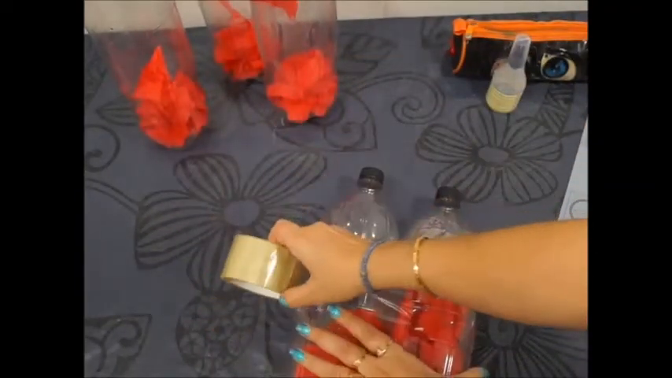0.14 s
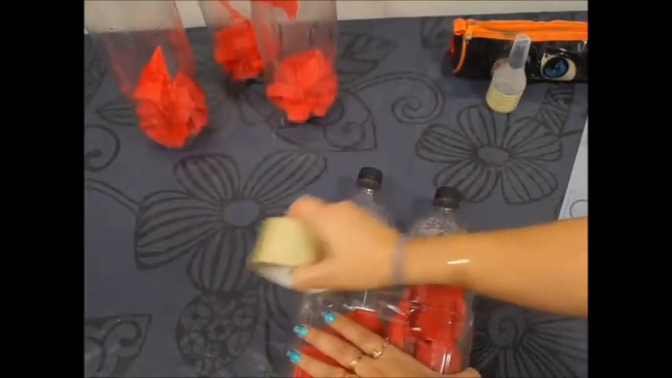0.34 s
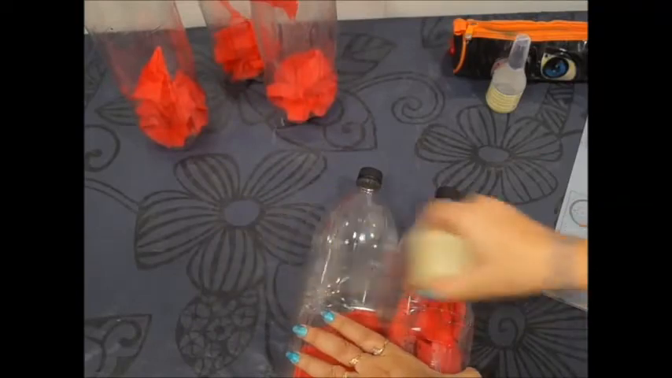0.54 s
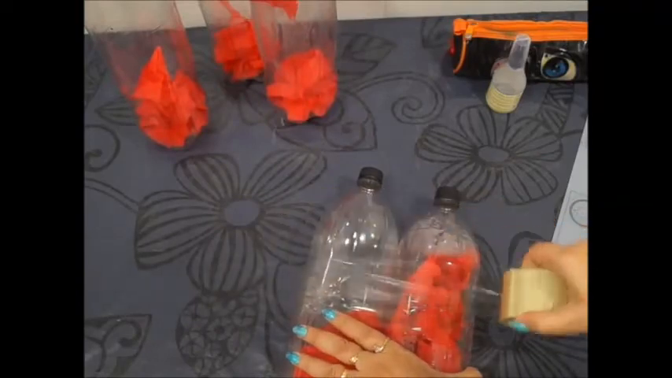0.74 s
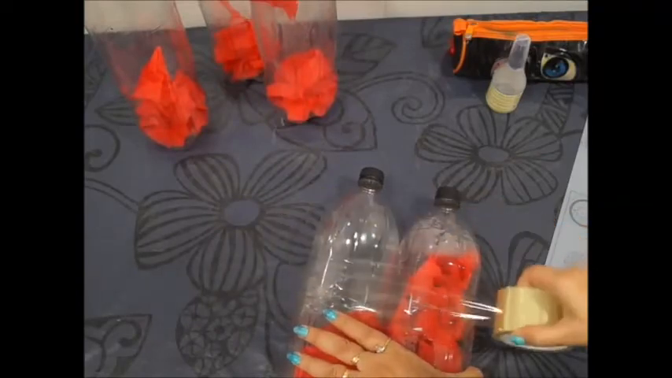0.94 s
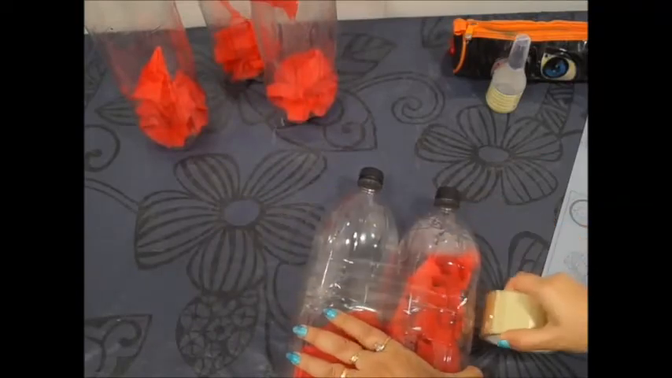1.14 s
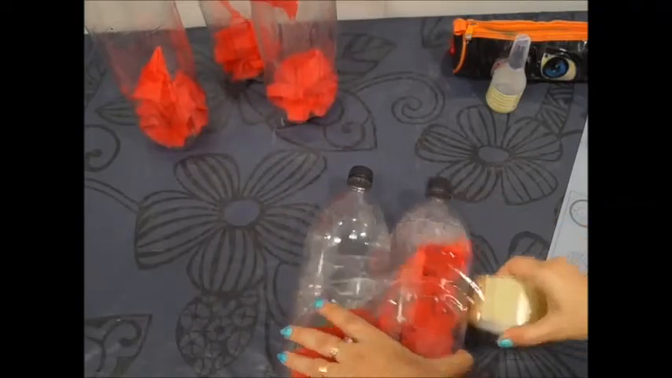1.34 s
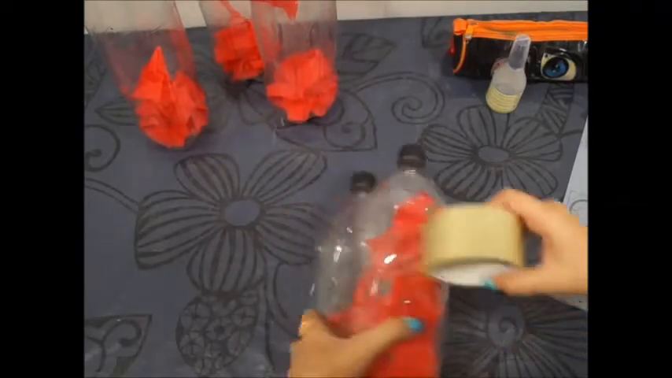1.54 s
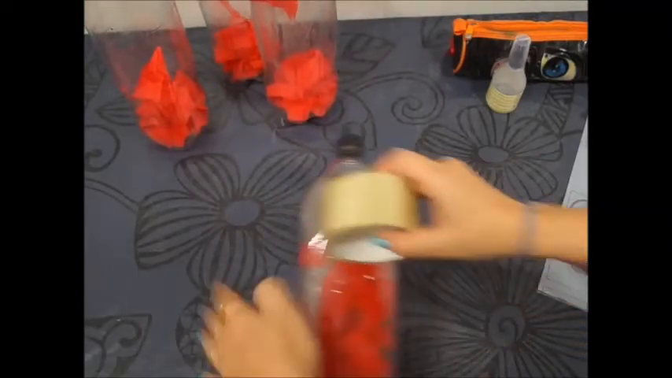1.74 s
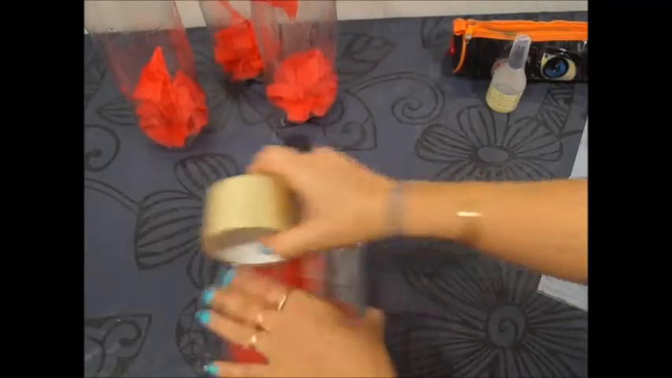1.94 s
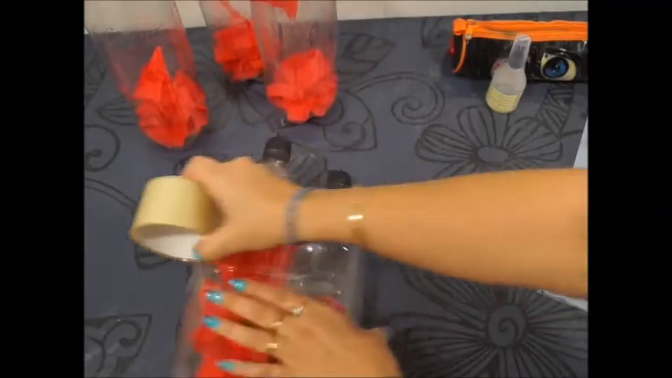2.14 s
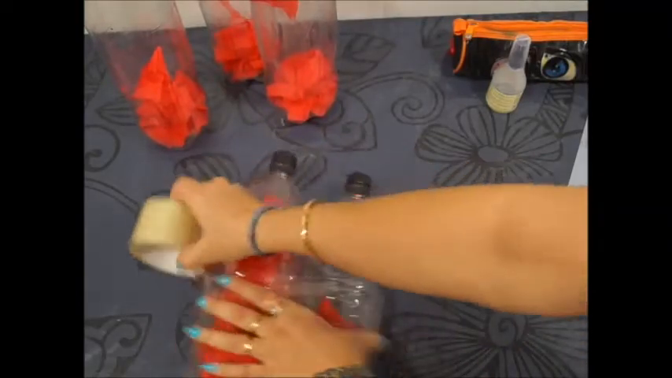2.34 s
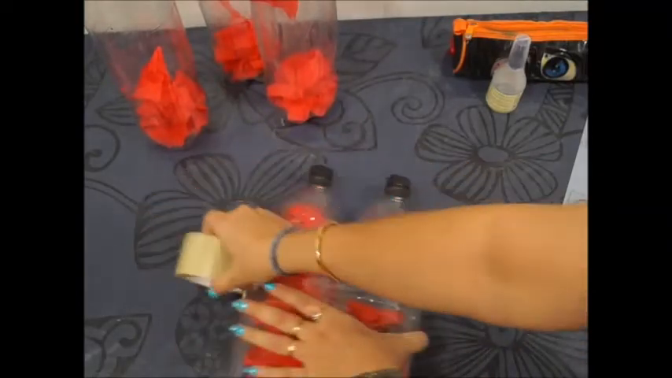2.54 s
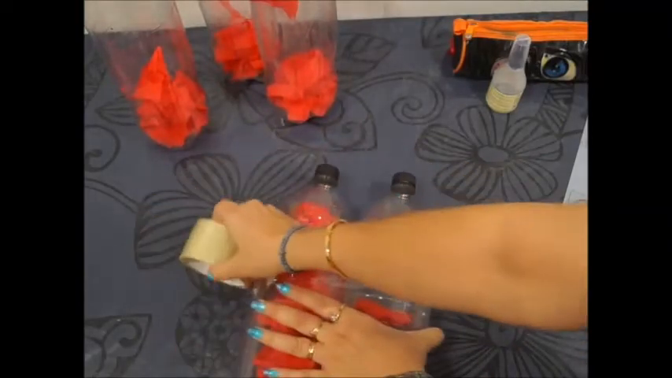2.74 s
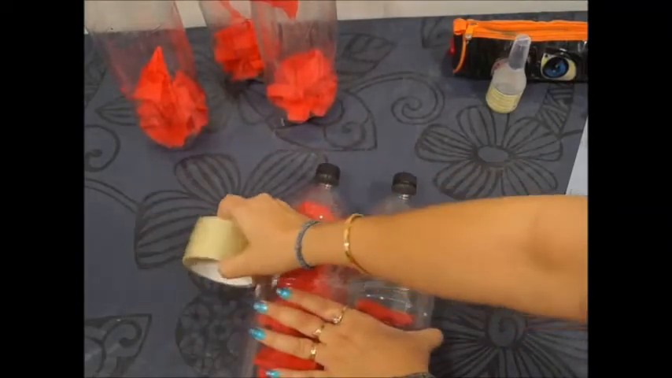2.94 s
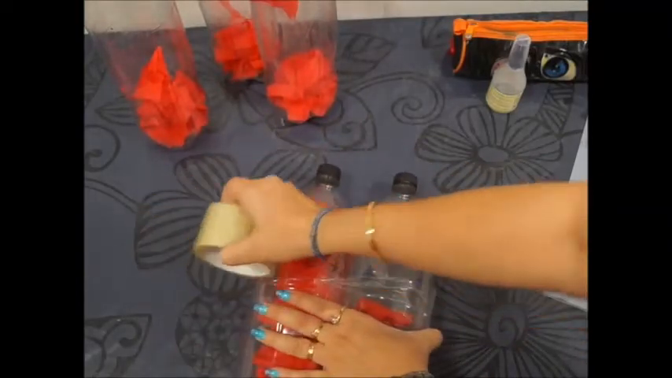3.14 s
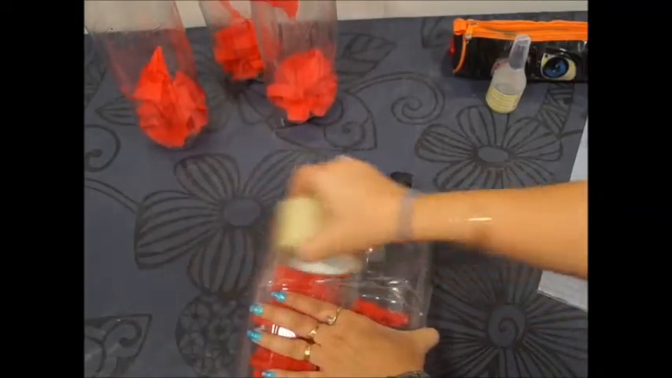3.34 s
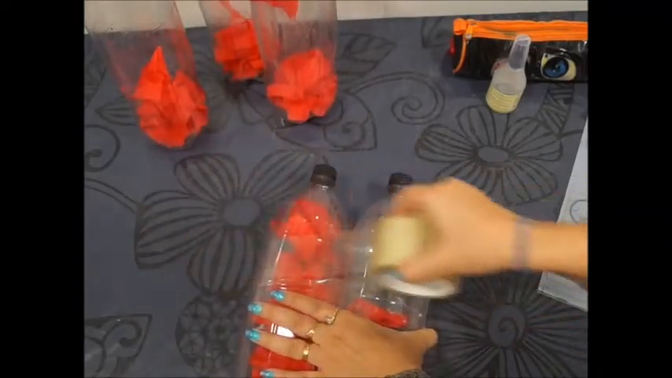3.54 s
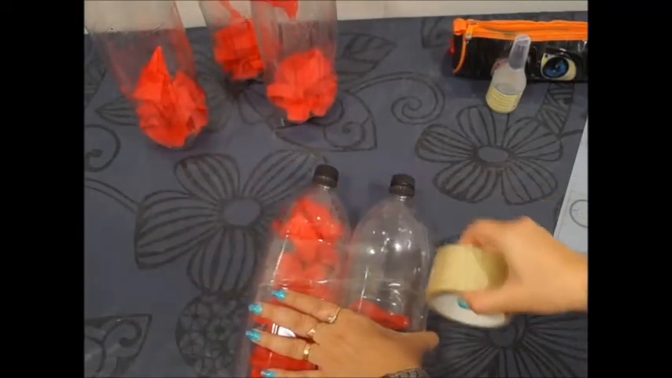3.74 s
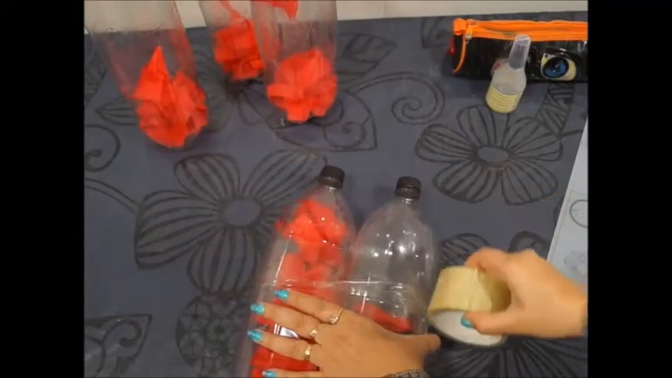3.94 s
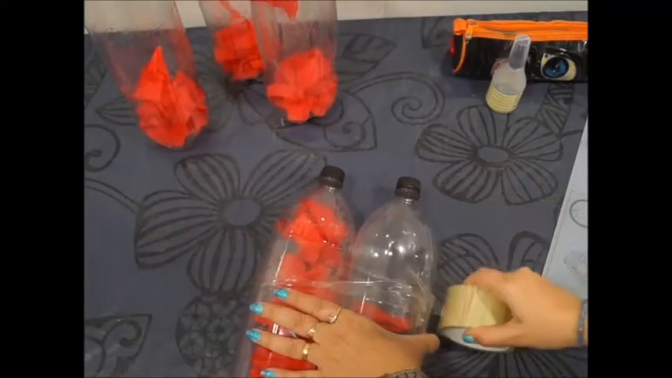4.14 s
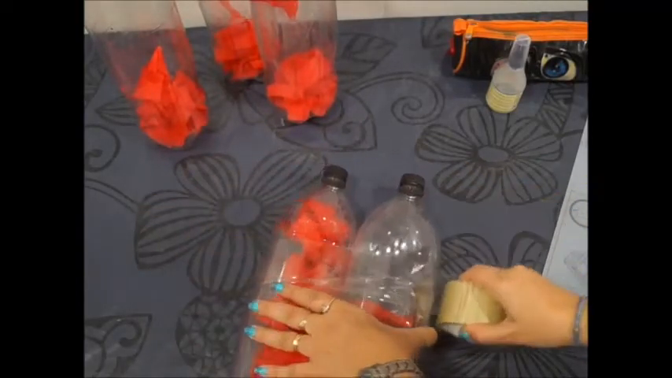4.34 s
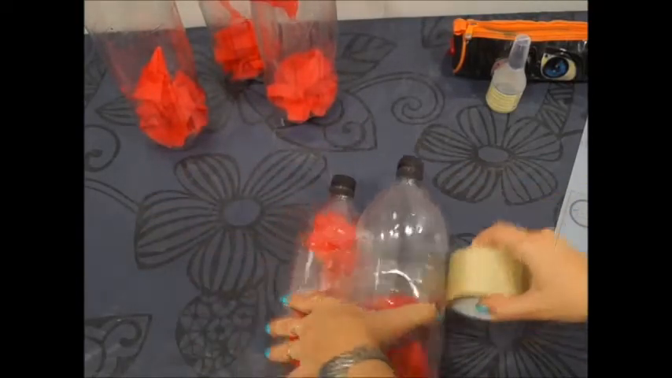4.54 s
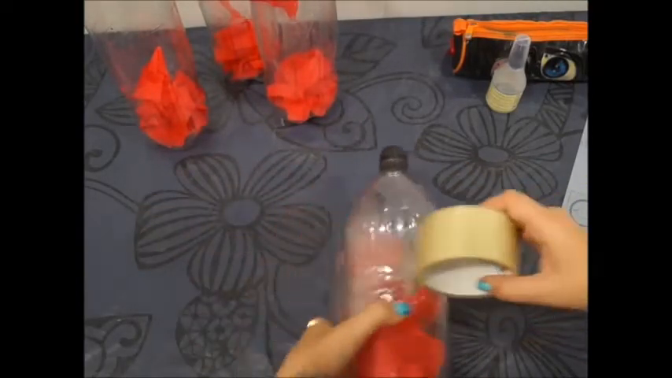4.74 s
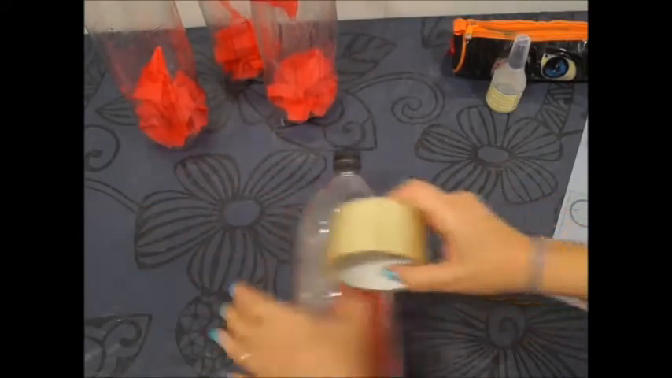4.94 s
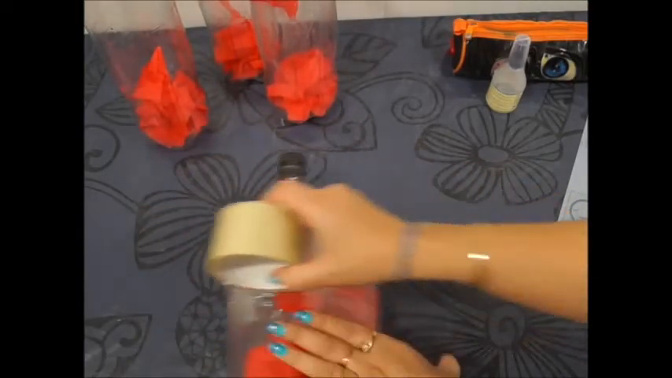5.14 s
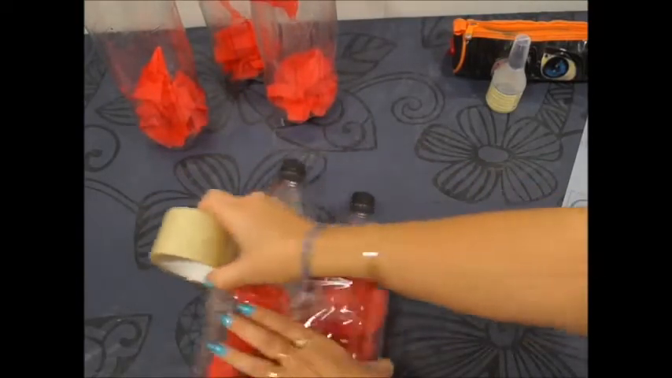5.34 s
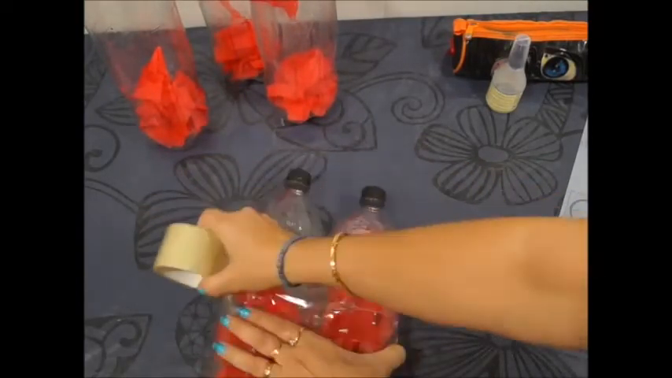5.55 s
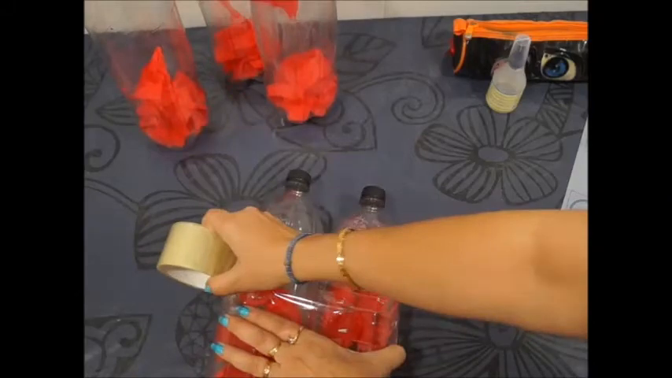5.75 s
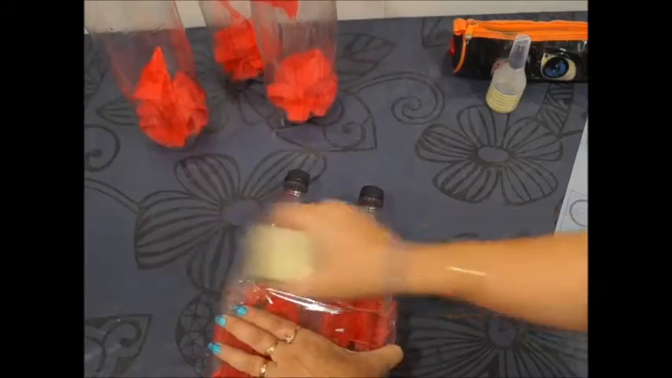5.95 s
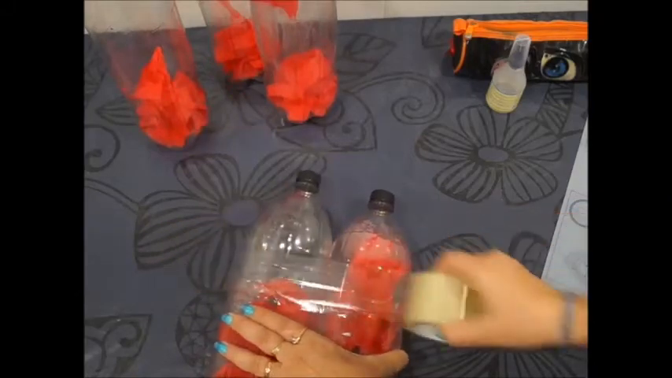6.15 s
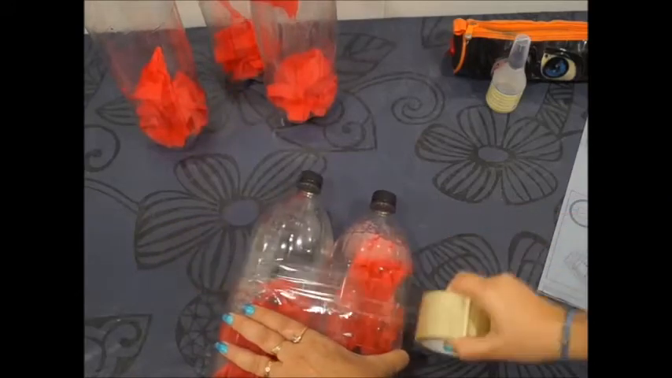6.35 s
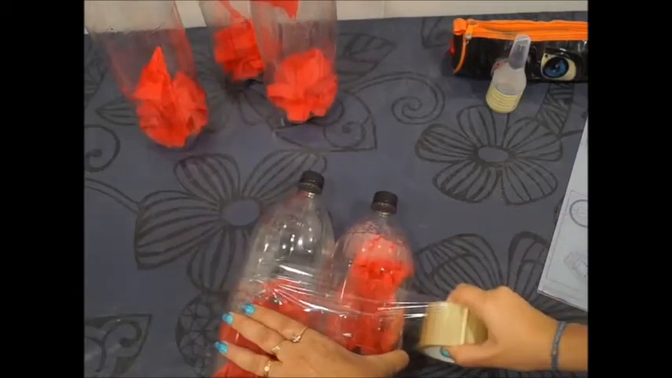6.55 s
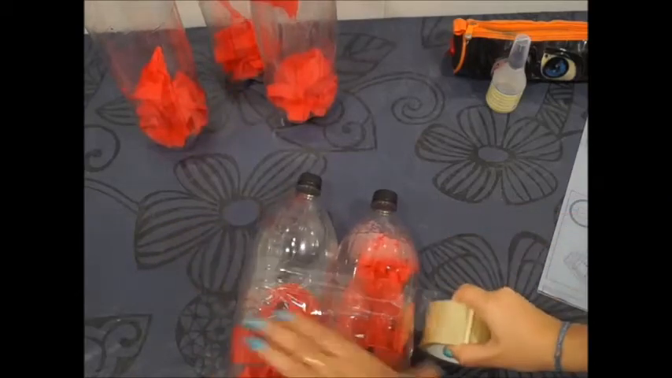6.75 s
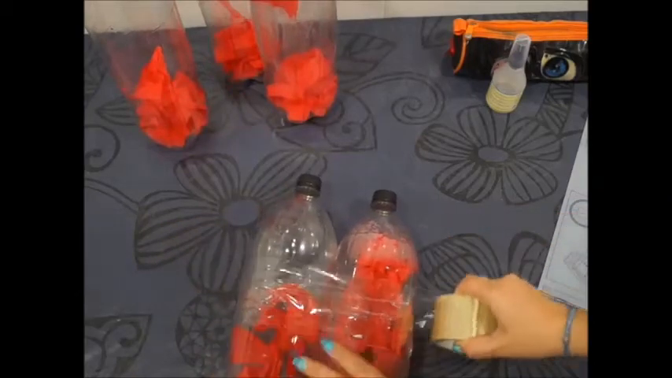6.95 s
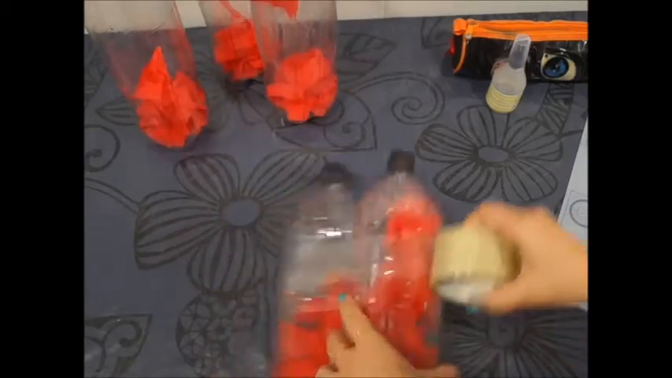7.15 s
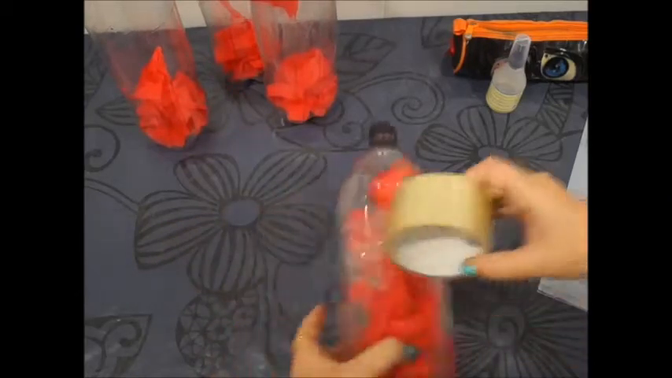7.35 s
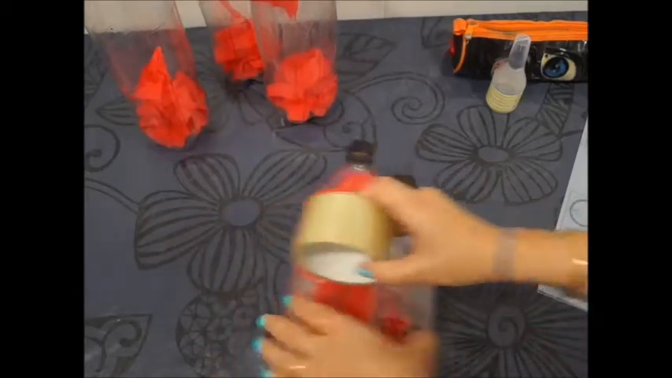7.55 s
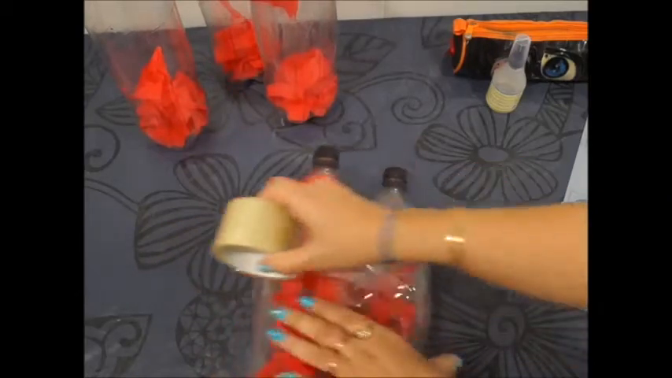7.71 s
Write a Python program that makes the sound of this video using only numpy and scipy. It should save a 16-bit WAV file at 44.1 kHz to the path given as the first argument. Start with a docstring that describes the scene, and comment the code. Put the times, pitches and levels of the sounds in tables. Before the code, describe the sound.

In a bare, lively room, faint rubs and bumps on plastic bottles give way to a harsh, buzzing peel of packing tape. Thin plastic cracks, hands shuffle the bottles, then a longer juddering pull ends in a quick ripping tug. More handling, a third short pull, another tug and crackling follow. The close microphone also picks up quiet room noise and faint hum.

```python
"""Wide packing tape is pulled off its roll three times and wound round two plastic bottles in a bare, lively room.
At first the bottles are rubbed and bumped; then glue lets go in rapid slips that buzz through the taut strip.
After each pull the thin bottle walls crack, and between pulls hands turn, rub and set down the bottles.
After the second and third pulls a last tug also rips tape free in a quick run of cracks.
Pulls and cracks ring bodies, rubs are clumps of clicks; room noise and a faint hum run throughout."""
import sys
import numpy as np
from scipy import signal
from scipy.fft import rfft, irfft, next_fast_len
from scipy.io import wavfile
from scipy.ndimage import uniform_filter1d

SR = 44100
rng = np.random.default_rng(int(sys.argv[2]) if len(sys.argv) > 2 else 0)


def generate_wav(signal):
    """Clip the signal to [-1, 1] and save it as 16-bit WAV at the path in sys.argv[1]."""
    frames = np.transpose(np.atleast_2d(signal))
    scaled = np.clip(frames, -1, 1) * 32767
    pcm = np.round(scaled).astype(np.int16)
    wavfile.write(sys.argv[1], SR, pcm)


N = 343098
TIME = np.arange(N) / SR
BASS_BELOW_HZ, TREBLE_ABOVE_HZ = 600, 2500   # the middle lies between


def from_db(db):
    """Decibels to gain."""
    return 10 ** (np.asarray(db) / 20)


def rms_one(x):
    """Scale to unit rms."""
    return x / np.sqrt(np.mean(x ** 2) + 1e-20)


def at_hz(points, hz):
    """Read a table of (Hz, value) on a log-frequency axis."""
    table_hz, values = np.array(points).T
    return np.interp(np.log(np.maximum(hz, 1)), np.log(table_hz), values)


def drift(count, rate):
    """Smooth random wander of spread 1 that turns about rate times a second."""
    knots = rng.standard_normal(4000)
    return rms_one(np.interp(np.arange(count) * rate / SR, np.arange(len(knots)), knots))


def add(out, start_s, sound):
    """Mix a sound in at a given time."""
    at = max(round(start_s * SR), 0)
    out[at:at + len(sound)] += sound[:max(N - at, 0)]


def split(x, hz):
    """The parts below and above a frequency, in phase with each other."""
    parts = []
    for kind in ("low", "high"):
        once = signal.butter(2, hz, kind, fs=SR, output="sos")
        parts.append(signal.sosfilt(np.tile(once, (2, 1)), x))
    return parts


def step(t, at, width_s):
    """Smooth rise from 0 to 1 round a given time."""
    return .5 + .5 * np.tanh((t - at) / (2 * width_s))


def body(spectrum, modes, size=4096):
    """Impulse response of a solid body: a broad colour with resonances standing out of it."""
    hz = np.arange(size // 2 + 1) * SR / size
    peaks = sum(from_db(db) / (1 + (2 * (hz - f) / width) ** 2) for f, width, db in modes)
    # folding the cepstrum makes the response start at once, with no ringing ahead of the blow
    cepstrum = irfft(np.log(from_db(at_hz(spectrum, hz)) * (1 + peaks)))
    cepstrum[1:size // 2] *= 2
    cepstrum[size // 2 + 1:] = 0
    return irfft(np.exp(rfft(cepstrum)))[:size // 2]


def radiate(force, response):
    """Middle, treble and bass of a body driven by a force."""
    low, rest = split(signal.fftconvolve(force, response), BASS_BELOW_HZ)
    middle, treble = split(rest, TREBLE_ABOVE_HZ)
    bass = sum(split(low, TREBLE_ABOVE_HZ))   # the same second split keeps it in phase
    return middle, treble, bass


def grains(count, per_s, spread_db):
    """Random tiny ruptures of uneven size and either sign; rms 1."""
    sizes = from_db(spread_db * np.minimum(rng.exponential(1, count), 4)) * rng.choice([-1, 1], count)
    return rms_one(sizes * (rng.random(count) < per_s / SR))


def fade(t, start, end, rise_s, fall_s):
    """Gate that opens just before start and dies away after end."""
    opening = np.clip((t - start) / rise_s + 1, 0, 1) ** 2
    return opening * np.exp(-np.maximum(t - end, 0) / fall_s)


# half length of a jerk; depth at first, growing as this power of the way pulled
JERK_S, JUDDER_START_DB, JUDDER_GROWTH = 0.0058, 1, 1.7


def judder(t, start, period_s, depth_db):
    """The roll jerks at an even rate; each jerk gathers the energy of the moments round it."""
    off = (t - start + period_s / 2) % period_s - period_s / 2
    swell = depth_db * np.exp(-(off / JERK_S) ** 2)
    return from_db(swell) / np.sqrt(uniform_filter1d(from_db(2 * swell), size=3500))


# The broad colour of the tape and roll. Each row: frequency in Hz, relative level in dB.
TAPE_COLOUR = [(50, -41), (110, -18), (170, -20), (280, -14), (450, -3), (620, -5), (800, 4.5),
               (1150, -0.5), (1700, 2.5), (2300, 0), (3200, -5), (5000, -8), (7000, -11.5), (11000, -13)]
# Where the roll rings. Each row: frequency in Hz, width in Hz, height in dB against the colour there.
ROLL_RINGS = [(157.3, 13, 11.5), (250, 40, -24.5), (454, 13, -16.5), (817, 30, 2), (870, 22, 2.5),
              (1002, 32, 4.5), (1080, 54, 6.5), (1332, 68, 10), (1553, 70, 7.5), (1614, 23, 3.5),
              (1755, 30, -7.5), (2067, 78, -4.5), (2370, 14, -19.5), (2410, 10, 8.5)]
# The pulls of the roll over the bottles. Each row: start in seconds, end in seconds, fade after the end
# in seconds, rasp in dB (before rasp_db), crackle in dB, extra fizz before the top in dB, time at the top
# of the arc in seconds, rasp swell there in dB, time the strip meets the far bottle in seconds,
# drone before that in dB, drone after it in dB, judder period in seconds, judder depth at the end in dB.
TAPE_PULLS = [(0.296, 0.757, .007, -19.5, -26, 6.5, 0.495, 6.5, 0.51, -49.5, -34, .0499, 17),
              (3.052, 3.706, 0.029, -19, -24.8, -1, 3.285, 3.5, 3.455, -34.5, -30.5, .0531, 13),
              (5.866, 6.196, 0.046, -18.5, -23.5, -7, 5.925, 1.5, 5.985, -39.5, -32.5, .0344, 11.5)]
TOP_S, TOP_RING_DB = 0.036, 8   # half length of the pass over the top; the short free strip rings harder
FIZZ_LEAD_S, FIZZ_FADE_S = .055, .015   # the extra fizz changes over just before the top
FIZZ_DB, FIZZ_HZ = -26, 5500   # the finest glue threads, above this frequency
MEET_S = .006   # the strip settles on the far bottle
SLOWING_DB = 2   # the pull slows and grows quieter toward its end
# resonance of the strip: slack, rise with tension, rise over the top
STRIP_HZ, STRIP_RISE_HZ, TOP_RISE_HZ = 1030, 271, 270
STRIP_RING_DB, STRIP_DAMPING_DB = -0.5, 19   # its strength at first; loss as it is laid on the bottles


def steady(x):
    """The hand pulls with steady force, so the power evens out over many slips."""
    return x / np.sqrt(uniform_filter1d(x * x, size=1300) + 1e-12)


def peel(pull, slips_per_s=265, jitter=.22, uneven_db=2.0, snap_s=0.0076, glue=0.51, pluck=.25,
         coarse=0.16, strip_width_hz=110, flutter_db=2.0, rasp_db=-3.0):
    """The peel line sticks and slips; each slip plucks the strip and snaps a row of glue threads."""
    (start, end, release_s, level, crackle, extra_fizz, top, swell, meet,
     drone_before, drone_after, period_s, depth_db) = pull
    t = np.arange(start - .02, end + .12, 1 / SR)
    count = len(t)
    # over the top of its arc the roll is nearest and the strip shortest; then the far bottle joins in
    on_top = np.exp(-((t - top) / TOP_S) ** 2)
    pulled = np.clip((t - start) / (end - start), 1e-6, 1)
    rasp = level + rasp_db + swell * on_top
    strip_hz = STRIP_HZ + STRIP_RISE_HZ * pulled + TOP_RISE_HZ * on_top
    ring_db = STRIP_RING_DB - STRIP_DAMPING_DB * pulled + TOP_RING_DB * on_top
    fizz = FIZZ_DB + extra_fizz * (1 - step(t, top - FIZZ_LEAD_S, FIZZ_FADE_S))
    drone = drone_before + (drone_after - drone_before) * step(t, meet, MEET_S)

    # one click each time the running count of slips passes a whole number
    turns = np.cumsum(slips_per_s * np.exp(jitter * drift(count, 250))) / SR
    clicks = np.diff(np.floor(turns), prepend=0)
    slips = rms_one(clicks * from_db(uneven_db * np.clip(rng.standard_normal(count), -2, 2)))
    snapping = signal.lfilter([1], [1, -np.exp(-1 / (snap_s * SR))], slips)
    threads = rms_one(snapping * grains(count, 16000, 3.2))

    # the slips shake roll and bottles; tiny threads and a few coarse ones make most of the treble
    roll = body(TAPE_COLOUR, ROLL_RINGS)
    middle, _, bass = [band[:count] for band in radiate(slips + glue * threads, roll)]
    treble_force = threads + pluck * slips + coarse * grains(count, 150, 1.9)
    treble = radiate(treble_force, roll)[1][:count]

    # the free strip rings at a pitch that follows its length and tension
    spin = np.exp(2j * np.pi * np.cumsum(strip_hz) / SR)
    ringing = signal.lfilter([1], [1, -np.exp(-np.pi * strip_width_hz / SR)], middle / spin)
    strip = np.real(spin * ringing)
    middle = rms_one(middle) + from_db(ring_db) * rms_one(strip)

    # the glue holds in patches, so the colour keeps shifting
    crackling, fizzing = split(treble, FIZZ_HZ)
    parts = zip((middle, crackling, fizzing, bass), (rasp, crackle, fizz, drone))
    sound = sum(steady(band) * from_db(db + flutter_db * drift(count, 107.13)) for band, db in parts)

    # as the strip tightens the roll slows and judders harder
    depth = JUDDER_START_DB + (depth_db - JUDDER_START_DB) * pulled ** JUDDER_GROWTH
    effort = from_db(-SLOWING_DB * pulled ** 2) * judder(t, start, period_s, depth)
    out = np.zeros(N)
    add(out, t[0], sound * effort * fade(t, start, end, rise_s=0.016, fall_s=release_s))
    return out


# The broad colour of the thin plastic. Each row: frequency in Hz, relative level in dB.
PLASTIC_COLOUR = [(50, -41), (110, -25.5), (180, -27.5), (280, -13), (480, -7.5), (750, -3.5), (1100, -2),
                  (1600, -3), (2700, -0.5), (4200, -3), (6000, -4.5), (8500, -7), (11000, -12)]
# Where the bottles ring. Each row: frequency in Hz, width in Hz,
# height in dB against the colour there; wall() shifts the frequency and adds to the height.
BOTTLE_RINGS = [(158, 30, -2), (275, 50, 3), (750, 45, 2), (850, 60, 3), (1030, 50, -3), (1315, 50, 0),
                (2050, 45, -8), (2870, 110, -10), (4230, 150, -10)]


def wall(pitch, hollow_db):
    """Response of a bottle wall; squeezing shifts its resonances and makes them stand out."""
    return body(PLASTIC_COLOUR, [(hz * pitch, width, db + hollow_db) for hz, width, db in BOTTLE_RINGS])


def blows(rows, response, first, per_s, middle_db, treble_db, bass_db, count=4096):
    """A body takes one first click, then a short run of smaller ones, and rings."""
    out, t = np.zeros(N), np.arange(count) / SR
    for s, level, treble, bass, length in rows:
        force = rms_one(grains(count, per_s, 2.2) * np.exp(-(t / length) ** 2))
        force[0] += first * np.sqrt(count)
        # each run has only a mild colour of its own; most comes from the body
        spectrum = rfft(force)
        milder = irfft(spectrum / np.sqrt(np.abs(spectrum) + 1e-9))
        bands = radiate(milder * np.exp(-(t / (2 * length)) ** 2), response)
        gains = from_db([level + middle_db, level + treble + treble_db, level + bass + bass_db])
        # the level holds for about the length of the run
        add(out, s, sum(gain * band * np.sqrt(length * SR / np.sum(band ** 2))
                        for gain, band in zip(gains, bands)))
    return out


# Bottle walls and stuck tape crack. Each row: start in seconds, middle in dB, treble in dB against the
# middle, bass in dB against the middle, length in seconds; cracking() shifts all three levels.
WALL_CRACKS = [(0.982, -16.5, -6, -22, 0.012), (1.703, -39.5, -3, -34, 0.0038),
               (4.348, -37, -1.5, -10, 0.0045), (4.378, -34.5, -2, -16, 0.0034),
               (4.9, -23, -5, -20.5, 0.0066), (5.21, -32, -4, -11, 0.0079), (5.591, -40.5, -1, -30, 0.0048),
               (5.785, -18, -13, -18.5, 0.015), (5.826, -10, -10.5, -15, 0.012),
               (6.236, -17.5, -8, -21, .005), (6.774, -43, -11, -13, 0.016), (6.947, -48, -10, -14, 0.0069),
               (7.087, -39.5, 1, -13, 0.016), (7.184, -40, 2.5, -30, 0.0065),
               (7.266, -35.5, -0.5, -15, 0.0065), (7.279, -37, 5, -26, 0.0088),
               (7.321, -41, 9, -29, 0.0091), (7.461, -18, -3, -18, 0.0039)]


def cracking():
    """The thin walls buckle with a click and settle in smaller ones."""
    return blows(WALL_CRACKS, wall(pitch=1.02, hollow_db=2.0), first=0.38, per_s=4000,
                 middle_db=-5.5, treble_db=4.0, bass_db=2.5)


# Last tugs that rip a little more tape free. Each row: start in seconds, first crack in dB, growth in dB
# per crack, treble in dB against the middle, pitch of the squeezed bottles as a multiple of their own;
# tugging() shifts the crack and treble levels.
LAST_TUGS = [(4.021, -11, 0.73, -8, .94), (6.416, -11, -0.21, -7.5, 1.1)]
TUG_GAP_S, TUG_CRACK_S = .013, 0.0098   # spacing and length of the cracks
# each crack has less treble and slightly less bass, against its middle, than the one before;
# the bass starts at this level before tugging() shifts it
TUG_DULLING_DB, TUG_BASS_DB, TUG_BASS_GROWTH_DB = 1.5, -26, -0.3


def tugging(tug, count=5):
    """A tug is a quick run of cracks that sets the squeezed bottles ringing."""
    s, level, growth, treble, pitch = tug
    rows = [(s + k * TUG_GAP_S, level + k * growth, treble - k * TUG_DULLING_DB,
             TUG_BASS_DB + k * TUG_BASS_GROWTH_DB, TUG_CRACK_S) for k in range(count)]
    return blows(rows, wall(pitch, hollow_db=5.0), first=0.25, per_s=4000,
                 middle_db=-6.0, treble_db=4.0, bass_db=4.0)


# Hands and table bump the bottles. Each row: start in seconds, middle in dB, treble in dB against the
# middle, bass in dB against the middle, length in seconds; bumping() shifts all three levels.
BOTTLE_BUMPS = [(0.076, -42, -5.5, -16, .044), (0.118, -32, -13, -9, 0.015), (1.206, -34, -22, -24, .011),
                (1.394, -31, -12.5, -31, 0.022), (2.3, -35.5, -20, -14, 0.015),
                (2.447, -30.5, -14.5, -18, 0.029), (2.833, -37.5, -0.5, -25, 0.022),
                (2.901, -29.5, -5.5, -31, 0.06), (4.099, -18.5, -1.5, -13.5, 0.02),
                (4.651, -31.5, -6.5, -22, 0.0098), (5.52, -33, -22, -13, 0.021),
                (6.475, -29.5, -15, 2, 0.012), (6.956, -34.5, -8.5, -16, 0.013),
                (7.094, -22.5, -29, -30, 0.0065), (7.433, -33, -5, -1.5, 0.037),
                (7.453, -27, -0.5, -1.5, 0.016)]


def bumping(response):
    """A bump is a weak first touch and a short run of contacts that shake the held bottle."""
    return blows(BOTTLE_BUMPS, response, first=0.069, per_s=3000,
                 middle_db=-7.5, treble_db=-3.5, bass_db=-2.0)


# Strokes of hand and film on the bottles. Each row: middle of the stroke in seconds, length in seconds,
# level of the middle band in dB, treble in dB against it; rubbing() shifts both levels.
RUB_STROKES = [(0.005, 0.089, -47.5, 0.5), (0.27, 0.1, -45.5, -4), (1.36, .26, -50.5, -5),
               (1.631, 0.43, -50, 5), (1.97, .56, -63.5, -7), (2.259, 0.25, -49, -3), (2.45, .26, -51, 3.5),
               (2.738, 0.24, -49, 5.5), (2.979, 0.13, -38, -2.5), (4.015, 0.089, -48, 1),
               (4.509, 0.37, -49.5, 0), (4.744, .28, -55, 12.5), (4.838, 0.086, -49, -20),
               (5.389, 0.19, -47.5, -1), (5.53, 0.2, -43, -2.5), (5.79, .08, -45.5, -4),
               (7.06, 0.33, -46.5, -3), (7.328, 0.2, -43.5, -1), (7.748, 0.075, -54.5, -22)]
RUB_BASS_DB, RUB_SHAPE = -14, 1.13   # bass against middle; a stroke follows this power of a half sine


def rubbing(response, per_s=6000, spread_db=1.5, patchy_db=5.5, middle_db=-4.5, treble_db=-5.0):
    """Skin and film catch on the plastic in clumps of tiny clicks."""
    out = np.zeros(N)
    for s, length, level, treble in RUB_STROKES:
        t = np.arange(max(s - length / 2, 0), s + length / 2, 1 / SR)
        force = grains(len(t), per_s, spread_db) * from_db(patchy_db * drift(len(t), 60))
        bands = zip(radiate(force, response), (middle_db, treble + treble_db, middle_db + RUB_BASS_DB))
        sound = sum(rms_one(band[:len(t)]) * from_db(level + db) for band, db in bands)
        add(out, t[0], sound * np.abs(np.cos(np.pi * (t - s) / length)) ** RUB_SHAPE)
    return out


# How long the room rings. Each row: frequency in Hz, time to fall by 60 dB in seconds.
ROOM_DECAY = [(150, 0.22), (800, 0.48), (2500, 0.5), (5000, 0.426), (10000, 0.35)]
# How wide the room sounds. Each row: frequency in Hz, side signal in dB against the mid signal.
ROOM_WIDTH = [(100, -17), (500, -9), (1200, -8), (2200, -4.5), (8000, -7)]


def room(x, travel_hz, wet_db=-3.0, direct_db=-3.0, build_s=0.0031, count=36000, size=28000):
    """Reflections build up, die band by band and change pattern as the source goes round three places."""
    t, hz = np.arange(count) / SR, np.arange(count // 2 + 1) * SR / count
    white = rfft(rng.standard_normal((3, 2, count)))   # three places, mid and side
    centres = np.geomspace(150, 10000, 7)
    tail = 0
    for share, centre in zip(np.eye(len(centres)), centres):
        band = irfft(white * at_hz(np.column_stack([centres, share]), hz))
        tail = tail + band * from_db(-60 * t / at_hz(ROOM_DECAY, centre))
    tail = rfft(tail * np.minimum(t / build_s, 1))
    # the walls favour no broad band over its neighbours
    tail /= np.sqrt(uniform_filter1d(np.abs(tail) ** 2, size=48, axis=-1))
    tail[:, 1] *= from_db(at_hz(ROOM_WIDTH, hz))
    # share the sound among the three places at even total power
    nearness = np.maximum(np.cos(2 * np.pi * (travel_hz * TIME - np.arange(3)[:, None] / 3)), 0)
    sent = x * nearness / np.linalg.norm(nearness, axis=0)
    echoes = signal.oaconvolve(sent[:, None], irfft(tail)[..., :size], axes=2)
    mid, side = echoes.sum(axis=0)[:, :N]
    return from_db(direct_db) * x + from_db(wet_db) * (mid + side * [[1], [-1]])


# The colour of the quiet room noise. Each row: frequency in Hz, relative level in dB.
AIR_COLOUR = [(15, -42.5), (25, -13), (44, -6), (75, -5.5), (112, -0.5), (131, -5.5), (156, -10.5),
              (518, -1.5), (721, -35), (819, 0.5), (1200, -18), (5670, -15.5), (11000, -26), (14300, -68),
              (22000, -120)]


def air(level_db=-65.0, side_db=-10.5, hum_hz=95.0, hum_db=-76):
    """Quiet room noise is coloured random noise; a faint steady hum is one sine."""
    size = next_fast_len(N)
    white = rfft(rng.standard_normal((2, size)))
    hz = np.arange(white.shape[1]) * SR / size
    mid, side = irfft(white * from_db(at_hz(AIR_COLOUR, hz)), size)[:, :N]
    noise = rms_one(mid) + from_db(side_db) * rms_one(side) * [[1], [-1]]
    return from_db(level_db) * noise + from_db(hum_db) * np.sin(2 * np.pi * hum_hz * TIME)


# The broad colour of a bottle in the hand. Each row: frequency in Hz, relative level in dB.
HANDLING_COLOUR = [(50, -20), (110, -13), (200, -10), (350, 3), (600, -1.5), (850, -1.5), (1300, -3.5),
                   (1900, -7), (2800, -9), (4200, -8), (6500, -13.5), (11000, -19)]


def scene(left_db=0.24):
    """Tape and bottles sound in the room, nearly straight ahead; successive cracks come from different spots."""
    handled = body(HANDLING_COLOUR, BOTTLE_RINGS)
    tape = sum(peel(pull) for pull in TAPE_PULLS)
    cracks = sum(tugging(tug) for tug in LAST_TUGS) + cracking()
    smooth = room(tape + rubbing(handled), travel_hz=4.0)
    sudden = room(cracks + bumping(handled), travel_hz=70.22, wet_db=-4.5, direct_db=-5.5, build_s=0.0028)
    return (smooth + sudden + air()) * from_db([[left_db], [-left_db]])


def record(dry, top=0.65):
    """Peaks are rounded and the highest treble is cut."""
    low_pass = signal.ellip(12, .1, 80, 11080, fs=SR, output="sos")   # cutoff in Hz
    return signal.sosfilt(low_pass, top * np.tanh(dry / top))


dry = scene()
out = record(dry)
generate_wav(out)
```